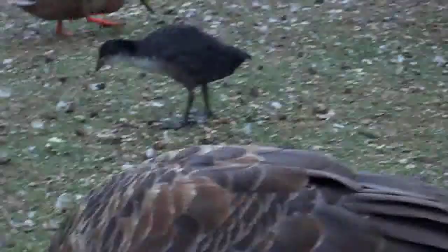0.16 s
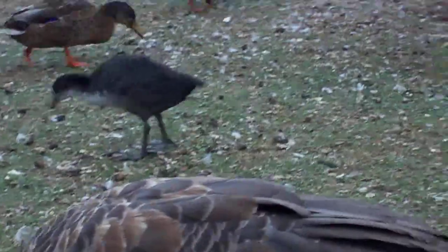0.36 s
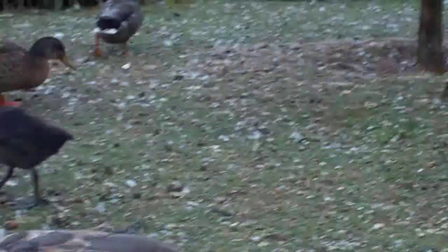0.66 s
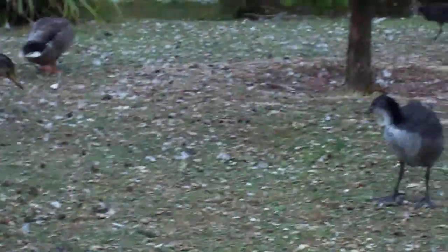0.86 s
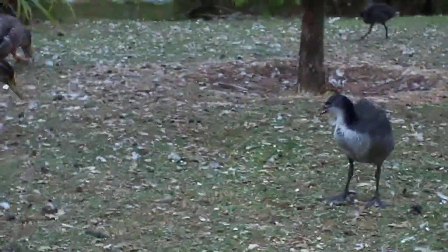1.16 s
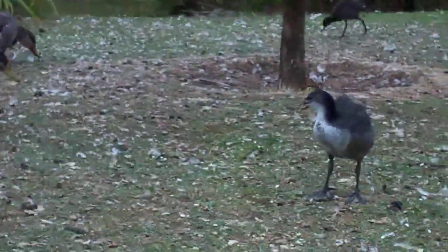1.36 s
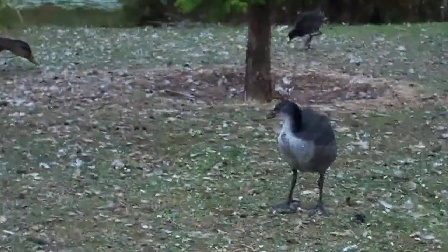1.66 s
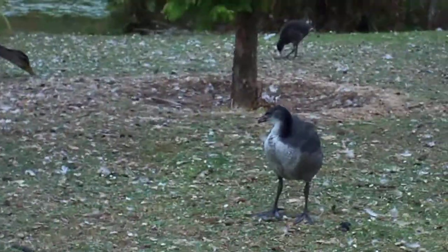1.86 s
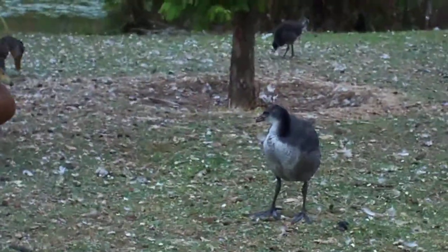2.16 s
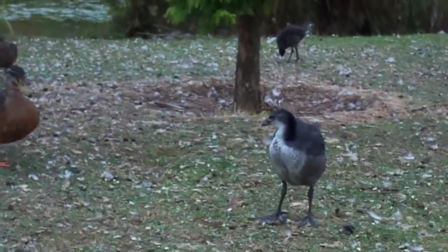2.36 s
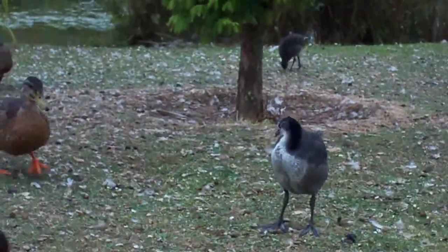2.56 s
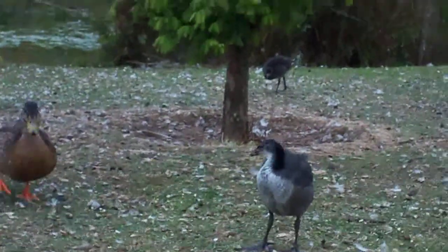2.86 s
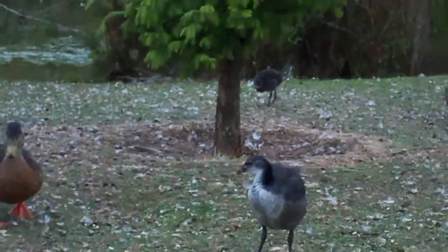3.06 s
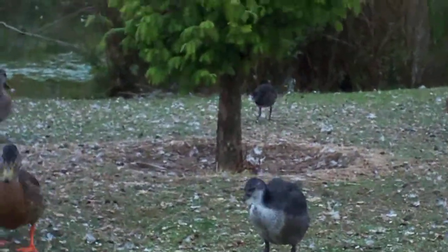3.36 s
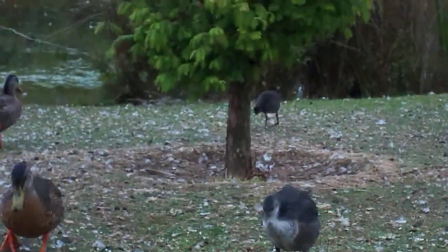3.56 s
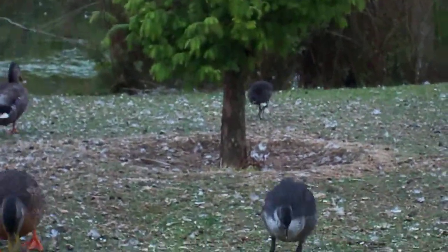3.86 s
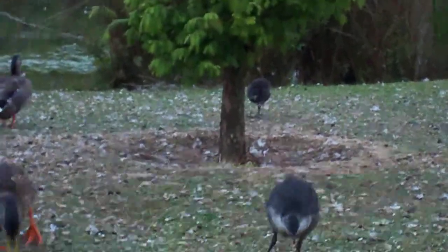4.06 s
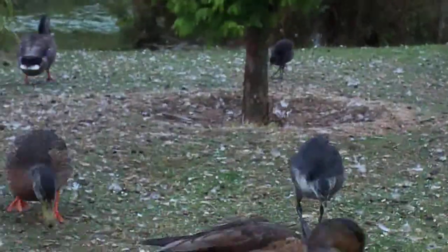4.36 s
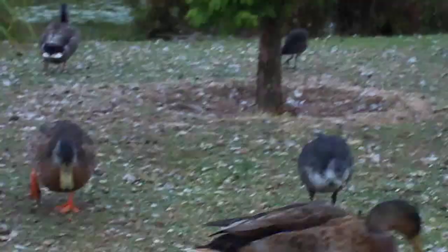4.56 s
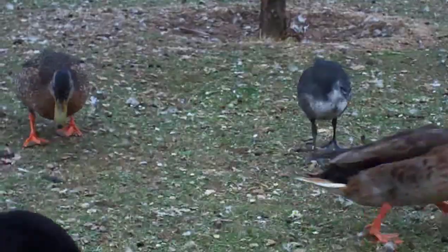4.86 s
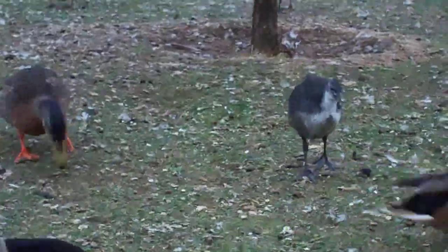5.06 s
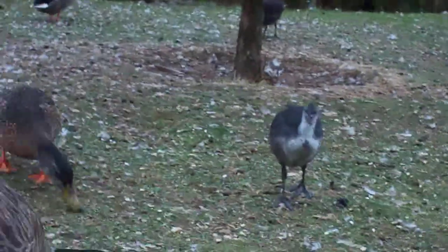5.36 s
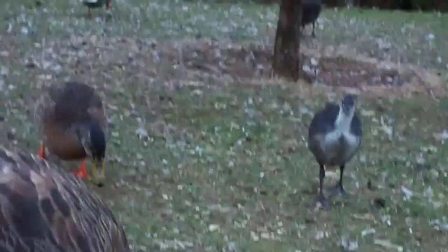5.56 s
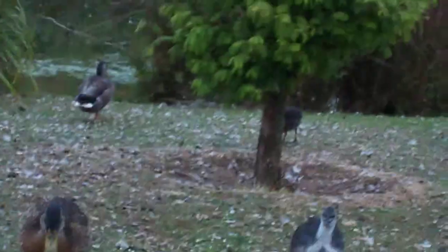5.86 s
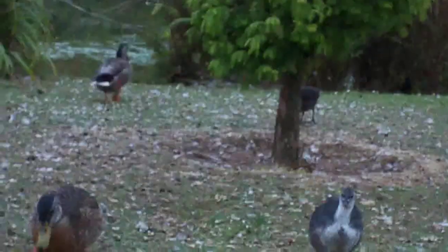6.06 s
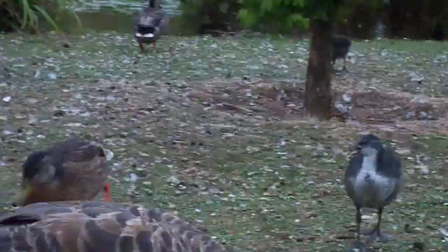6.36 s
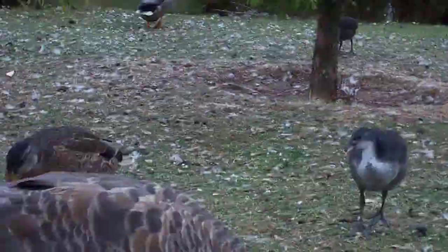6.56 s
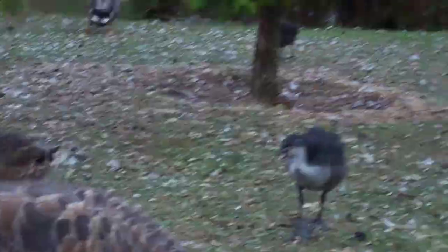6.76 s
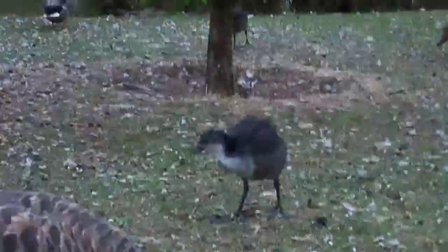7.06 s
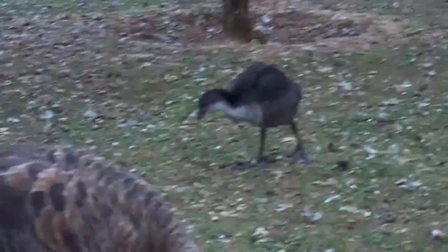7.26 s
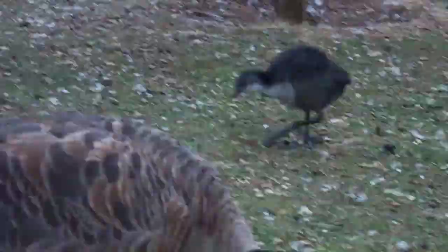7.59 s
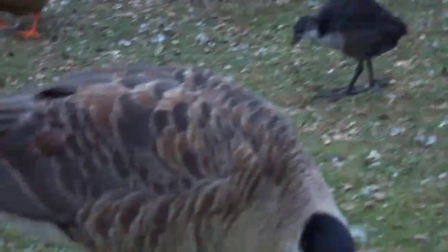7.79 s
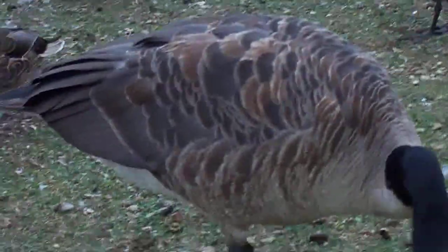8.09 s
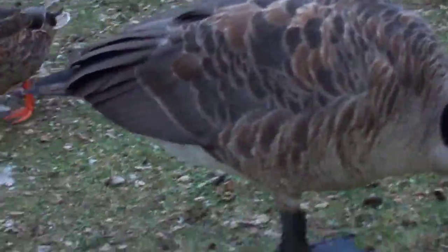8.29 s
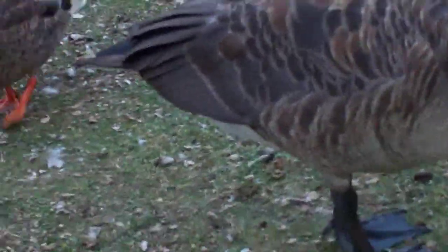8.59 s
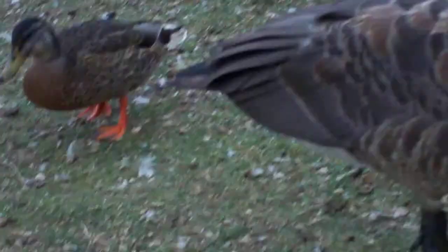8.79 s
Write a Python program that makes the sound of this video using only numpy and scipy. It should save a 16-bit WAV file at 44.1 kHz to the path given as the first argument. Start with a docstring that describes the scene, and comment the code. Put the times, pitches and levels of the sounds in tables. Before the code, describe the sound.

Young waterbirds beg with rasping, whistly calls while ducks cluck between them on a lakeside lawn; later a paper bag rustles close by.

```python
"""A lakeside lawn in open air: low far rumble and faint hiss (coloured noise), and a far motor's hum (a sine).
Young coots beg from the first half second: gliding whistles that break into chaos and split as they drop.
Ducks cluck between them (half-rate pulses through throat and chest); thin gliding notes (near chick, far birds),
a little duck chatter (slow pulses) and dry ticks follow. From about 6.2 s a feed bag rustles close by, random
grains with snapping creases; a soft bump reaches the small mono microphone, and the bag ends with two low thumps."""
import sys
import numpy as np
from scipy import signal
from scipy.fft import rfft, irfft, next_fast_len
from scipy.io import wavfile
from scipy.ndimage import map_coordinates

SR = 44100
rng = np.random.default_rng(int(sys.argv[2]) if len(sys.argv) > 2 else 0)


def unload_wav(signal):
    """Save mono or channel-first audio to the path in sys.argv[1] as 16-bit WAV at rate SR, clipped to [-1, 1]."""
    wavfile.write(
        sys.argv[1],
        SR,
        np.round(np.clip(np.atleast_2d(signal).T, -1, 1) * 32767).astype(np.int16),
    )


N = 393792
T = np.arange(N) / SR  # time of every sample [s]

# how the bag's paper colours its rustle and its snaps: (frequency [Hz], gain [dB])
PAPER_SPECTRUM = [(120, -30), (200, -8), (279, -0.5), (647, -8), (946, -1), (1320, 0.5), (1760, -1.5),
                  (2920, 0), (7200, -3.5), (7670, -5), (8850, -13), (11500, -48.5), (19500, -120)]


def undb(db):
    """Decibels to gain."""
    return 10 ** (np.asarray(db) / 20)


def unit(x):
    """Scale by the standard deviation, to rms 1 for a signal centred on zero."""
    return x / (np.std(x) + 1e-12)


def curves(rows, t):
    """Every column of a table after its times, joined by straight lines."""
    s, *columns = np.transpose(rows)
    return [np.interp(t, s, c) for c in columns]


def add(out, s, x):
    """Mix x in from time s."""
    i = max(int(s * SR), 0)
    out[i:i + len(x)] += x[:max(N - i, 0)]


def colour(x, points):
    """Filter by a spectrum of (frequency [Hz], gain [dB]) points, joined along log frequency."""
    hz, db = np.transpose(points)
    size = next_fast_len(len(x))
    f = np.maximum(np.fft.rfftfreq(size, 1 / SR), 1)
    gain = undb(np.interp(np.log(f), np.log(hz), db))
    return irfft(rfft(x, size) * gain, size)[:len(x)]


def ring(x, hz, width_hz):
    """One resonance, gain 1 at its centre."""
    return signal.lfilter(*signal.iirpeak(hz, hz / width_hz, fs=SR), x)


def wander(t, rate_hz):
    """Smooth curve through random steps of spread 1, rate_hz steps a second."""
    steps = rng.standard_normal(1 << 13)
    return map_coordinates(steps, [(t - t[0]) * rate_hz], order=3, mode="wrap")


def span(start, end):
    """Sample times of one call, and a gate that opens and shuts it softly."""
    t = np.arange(start, end, 1 / SR)
    return t, np.clip(np.minimum(t - t[0], t[-1] - t) / .004, 0, 1)


def turn(hz):
    """Phase of an oscillator: its frequency summed over time."""
    return 2 * np.pi * np.cumsum(hz) / SR


def ramp(t, length_s):
    """Goes from 0 to 1 in length_s, centred on t = 0."""
    return np.clip(t / length_s + .5, 0, 1)


def traffic():
    """Far traffic: noise of low frequencies whose level drifts and sways."""
    # shape of the rumble: (frequency [Hz], relative density [dB per Hz])
    rumble_spectrum = [(12, 2), (22, -1.5), (45, -4.5), (66, -2.5), (85, -11.5), (130, -17.5), (200, -31),
                       (400, -59)]
    # rumble before its sway: (time [s], level [dB])
    rumble_levels = [(0, -36.5), (.25, -35), (1.1, -36.5), (1.29, -43), (1.52, -36), (2.1, -39.5),
                     (5.3, -38.5), (6.1, -40), (8.93, -39)]
    sway_db, sway_hz = 1.35, 6
    rumble = unit(colour(rng.standard_normal(N), rumble_spectrum))
    return rumble * undb(curves(rumble_levels, T)[0] + sway_db * wander(T, sway_hz))


def park_air(air_db=-51):
    """Faint hiss of the park: coloured noise that sways slowly."""
    # shape of the hiss: (frequency [Hz], relative density [dB per Hz])
    air_spectrum = [(40, -19), (130, 2.5), (200, -1), (280, -3.5), (370, -14.5), (460, -9), (570, -16),
                    (900, -14), (1500, -22), (3000, -26.5), (7300, -26), (8500, -31.5)]
    air = unit(colour(rng.standard_normal(N), air_spectrum))
    return air * undb(air_db + 1.3 * wander(T, 2.444))


def motor(motor_hz=110.5, trim_db=-0.5):
    """A distant motor heard as one sine line whose pitch drifts slightly."""
    # hum before trim_db: (time [s], level [dB])
    motor_levels = [(0.0, -50), (2.21, -46), (2.34, -60), (2.54, -50), (4.2, -41), (4.35, -48.5),
                    (4.87, -38.5), (6.02, -59), (6.21, -44.5), (6.64, -59), (7.44, -41), (7.61, -51),
                    (8.58, -45), (8.93, -62)]
    hum = unit(np.sin(turn(motor_hz * (1 + 0.004 * wander(T, 2.36)))))
    return hum * undb(curves(motor_levels, T)[0] + trim_db)


def trees(x, echo_db=-27, t60_s=0.19):
    """Faint scatter from the trees along the shore: a decaying noise tail after a 10 ms gap."""
    t = np.arange(SR // 2) / SR
    tail = rng.standard_normal(len(t)) * np.exp(-np.log(1000) * t / t60_s) * (t > .01)
    return x + undb(echo_db) * signal.fftconvolve(x, tail / np.linalg.norm(tail))[:N]


def thin_note(start, length_s, start_hz, end_hz, db):
    """A thin gliding note, slightly wavering, with two weak overtones."""
    t, gate = span(start, start + length_s)
    left = np.linspace(1, 0, len(t))
    hz = end_hz + (start_hz - end_hz) * left ** 1.5  # glides fast at first, then levels off
    phase = turn(hz * (1 + 0.0031 * wander(t, 80)))
    swell = 2 * np.sqrt(left * (1 - left))
    tone = np.sin(phase) + undb(-10.5) * np.sin(2 * phase) + undb(-12) * np.sin(3 * phase)
    return gate * swell * undb(db) * unit(tone)


def chatter(t, length_s, pulse_hz=82):
    """Slow pulses of a duck's voice ring two throat resonances."""
    cycles = turn(pulse_hz * (1 + 0.094 * wander(t, 60))) / (2 * np.pi)
    pulses = np.diff(np.floor(cycles), prepend=0)
    lower = ring(ring(pulses, 1570, 400), 1600, 400)
    upper = ring(ring(pulses, 2830, 550), 2800, 550)
    return unit(lower + upper) * np.exp(-(t / length_s) ** 2)


def cluck(t, low_hz, burst_db, squeak_db, throat_hz, chest_db, burst_s=0.013):
    """A squeak dips and climbs out louder; around the bottom a burst of half-rate pulses breaks in."""
    dip = np.exp(-(t / .025) ** 2)
    burst = np.exp(-((t - .006) / burst_s) ** 2)  # just past the bottom
    top_hz = 1520 + 130 * np.tanh(t / .02)  # higher on the way out
    phase = turn((top_hz + (low_hz - top_hz) * dip) * (1 + .045 * dip * wander(t, 500)))
    pulses = sum(np.cos(k * phase / 2) for k in range(1, 15)) * undb(2 * wander(t, 400))
    throat = ring(ring(pulses, throat_hz, 880), throat_hz, 880)
    chest = ring(ring(pulses, 390, 480), 390, 480)
    voiced = (throat + undb(chest_db) * chest) * burst
    voiced = voiced / np.sqrt(np.average(voiced ** 2, weights=burst))
    squeak = np.sin(phase) + .4 * dip * np.sin(2 * phase)
    squeak = squeak * (dip + .4 * np.exp(-(t / .05) ** 4))
    climb = undb(3 * np.tanh(t / .015))  # the way up is louder than the way down
    return undb(burst_db) * voiced + undb(squeak_db) * squeak * climb


def ticks_and_thumps():
    """Dry ticks, and at the end two low dull thumps of the feed bag: short pushes on damped rings."""
    # the last two rows are the thumps: (time [s], peak level [dB], ring frequency [Hz], ring width [Hz])
    knocks = [(2.276, -35, 700, 1500), (3.7615, -34, 1800, 4000), (4.033, -35, 600, 1500),
              (4.2219, -19, 1500, 4000), (4.2236, -6, 3440, 1280), (5.29, -32, 1700, 2500),
              (8.607, -20.5, 450, 400), (8.628, -20.5, 480, 400)]
    out = np.zeros(N)
    push = np.pad(signal.windows.hann(12), (0, 500))
    for s, db, hz, width_hz in knocks:
        knock = ring(push, hz, width_hz)
        add(out, s, undb(db) * knock / np.abs(knock).max())
    return out


def bump():
    """A soft bump on the microphone: a dull low sine that swells and dies within a few cycles."""
    # (time of its middle [s], length [s], pitch [Hz], level [dB])
    thud = (7.405, .025, 74, -32)
    s, length_s, hz, db = thud
    swell = np.exp(-((T - s) / length_s) ** 2)
    return undb(db) * np.sqrt(2) * swell * np.sin(2 * np.pi * hz * (T - s))


def crackle(grain_rate, spread_db, bunch_db):
    """Tiny creases of uneven size, grain_rate a second on average, that come in bunches."""
    sizes = undb(spread_db * np.minimum(rng.exponential(size=N), 5)) * rng.standard_normal(N)
    return sizes * (rng.random(N) < grain_rate / SR) * undb(bunch_db * wander(T, 130))


def handling():
    """Strength of the rustle: fumbling with brief squeezes on top, added as power."""
    # fumbling with the bag, silent before the first row: (time [s], relative level [dB])
    fumbling = [(6.22, -70), (6.3, -50), (6.46, -56), (6.7, -38.5), (7.04, -44.5), (7.3, -40),
                (7.62, -41.5), (8.2, -43.5), (8.45, -51.5), (8.72, -43.5), (8.9, -63.5)]
    # squeezes of the bag: (time of the middle [s], length [s], relative level [dB])
    squeeze_rows = [(6.268, 0.019, -42.5), (6.784, 0.061, -34.5), (7.008, 0.0069, -37), (7.556, 0.021, -36),
                    (7.955, 0.045, -34), (8.607, 0.0085, -27.5), (8.632, 0.0068, -29.5)]
    squeezes = sum((undb(db) * np.exp(-((T - s) / length_s) ** 2)) ** 2
                   for s, length_s, db in squeeze_rows)
    steady = undb(curves(fumbling, T)[0]) ** 2 * (T > fumbling[0][0])
    return np.sqrt(steady + squeezes)


def rustle(crisp_db=-5.0, crisp_hz=6400, flutter_db=1.85):
    """Dense tiny creases of the bag crackle, and sparser crisp ones ride on top."""
    dense = crackle(grain_rate=4000, spread_db=1.75, bunch_db=2.5)
    sparse = crackle(grain_rate=1200, spread_db=3.5, bunch_db=5)
    body = unit(colour(dense, PAPER_SPECTRUM))
    crisp = unit(ring(colour(sparse, PAPER_SPECTRUM), crisp_hz, 3000))
    flutter = undb(flutter_db * wander(T, 45) - 1.5)
    return (body + undb(crisp_db) * crisp) * handling() * flutter


def snaps(snap_db=-1.5, crease_s=0.0015):
    """A few large creases snap: fast-dying noise through the paper and a broad resonance."""
    # (time [s], peak level before snap_db [dB], centre frequency [Hz])
    creases = [(6.2532, -27.5, 3760), (6.2797, -22, 3710), (6.6514, -21, 3660), (6.7244, -21, 3610),
               (6.7824, -18, 2790), (6.8277, -22, 2330), (6.8982, -25, 7120), (6.9194, -22.5, 7190),
               (6.972, -25, 2170), (6.9983, -21, 7250), (7.0087, -20.5, 7030), (7.0625, -19, 2070),
               (7.1112, -25, 3010), (7.1367, -20, 5940), (7.1462, -19.5, 3680), (7.215, -26, 6100),
               (7.267, -20, 3500), (7.3378, -20, 3750), (7.3914, -20.5, 5070), (7.4091, -22.5, 6480),
               (7.4757, -30, 3400), (7.5624, -27, 1560), (7.6244, -26, 4650), (7.6375, -20.5, 2930),
               (7.6674, -25, 5310), (7.701, -21.5, 5220), (7.8022, -14.5, 6990), (7.8344, -25, 4800),
               (7.8805, -23, 5600), (7.9474, -19.5, 2650), (8.0975, -24, 2570), (8.5946, -19, 1930),
               (8.6303, -16, 5110)]
    out = np.zeros(N)
    t = np.arange(SR // 50) / SR
    for s, db, hz in creases:
        snap = rng.standard_normal(len(t)) * np.exp(-t / crease_s)
        snap = ring(colour(snap, PAPER_SPECTRUM), hz, 8400)
        add(out, s, undb(db + snap_db) * snap / np.abs(snap).max())
    return out


def beg_pitch(t, clear, fall_s, rise_s, start_hz, held_hz, late_hz, step_hz, end_hz):
    """The pitch scoops to a held note and drifts, steps down as the rasp clears, then falls ever faster."""
    held = np.interp(t, [t[0], fall_s], [held_hz, late_hz])
    scoop = (start_hz - held_hz) * np.exp(-(t - t[0]) / rise_s)
    fall = np.clip((t - fall_s) / (t[-1] - fall_s), 0, 1) ** 1.95  # gathers speed
    return held + scoop - step_hz * clear - (late_hz - step_hz - end_hz) * fall


def beg_level(t, start_db, peak_db):
    """The chick pushes steadily harder and lets go at the very end; in dB."""
    onset_s, release_s, fade_db = 0.0073, 0.031, -25  # the fade in spans half of fade_db
    times = [t[0], t[0] + onset_s, t[-1] - release_s, t[-1]]
    return np.interp(t, times, [start_db + fade_db / 2, start_db, peak_db, peak_db + fade_db])


def membrane(t, hz, tone_db, over_db, half_db, rasp_db, rasp_hz, third_db=-3,
             chaos_swing=0.11, chaos_hz=900, chaos_db=-2, hiss_db=-4.5, smear=0.073):
    """A chick's membrane whistles, doubles its period, or tumbles into chaos when pushed hard."""
    # rasp noise as it leaves the beak: (frequency [Hz], gain [dB])
    beak_spectrum = [(900, -49.5), (1350, -15), (1650, -9), (2000, -5.5), (2500, -3.5), (2900, -14.5),
                     (3600, -0.5), (4400, -7), (5200, -10), (6900, -8), (7900, -12), (9000, -21)]
    growl_rise = 550  # Hz per s: the low growl climbs as the chick pushes harder
    hiss_growth = 0.094  # dB of extra breathy hiss per dB of rasp
    tone, over, half, rasp = undb([tone_db, over_db, half_db, rasp_db])
    rough = rasp / (rasp + tone)

    # the whistle grows less steady as the rasp takes over, and brighter as it gets louder
    phase = turn(hz * (1 + .003 * wander(t, 60.8) + 0.043 * rough ** 2 * wander(t, 700)))
    third = undb(third_db + 0.28 * (over_db + 32.0))
    overtones = np.sin(2 * phase) + third * np.sin(3 * phase)

    # every second cycle differs: lines between the harmonics, which smear in a rough voice
    split = phase / 2 + turn(hz * smear * rough * wander(t, 900))
    between = np.sin(phase + split)
    between = between + undb(-14.5) * np.sin(2 * phase + split) + undb(-13.5) * np.sin(3 * phase + split)
    # on high notes lines at the half pitch and just below the whistle take over
    high = np.clip((hz - 2750) / 200, 0, 1)
    below = np.sin(split) + np.sin(split * 3 / 2)
    between = (1 - 0.66 * high) * between + 0.97 * high * below
    whistle = tone * np.sqrt(2) * np.sin(phase) + over * unit(overtones) + half * unit(between)
    whistle = whistle * undb(.8 * wander(t, 120))

    # in chaos the pitch jumps from one millisecond to the next, and a low rasp growls near half of it
    tumble = turn(rasp_hz * (1 + chaos_swing * wander(t, chaos_hz)))
    growl_hz = rasp_hz * .55 + growl_rise * (t - t.mean())
    growl = np.sin(turn(growl_hz * (1 + .04 * wander(t, 600))))
    growl = undb(-12) * np.clip((3500 - rasp_hz) / 600, 0, 1) * growl  # fades out in high rasps
    chaos = (np.sin(tumble) + undb(-15) * np.sin(2 * tumble) + growl) * undb(1.2 * wander(t, 400))

    hiss = unit(colour(rng.standard_normal(len(t)), beak_spectrum)) * undb(0.93 * wander(t, 320))
    hiss_gain = undb(hiss_db + hiss_growth * (rasp_db + 37))
    return whistle + rasp * (undb(chaos_db) * unit(chaos) + hiss_gain * hiss)


def beg(start, fall_s, end, rise_s, start_hz, held_hz, late_hz, step_hz, end_hz,
        start_db, peak_db, bright_db, rasp_on, rasp_off, rasp_db, duck_db, rasp_start_hz, rasp_end_hz,
        split_s):
    """One call swells from a whistle into a rasp, clears on a lower note, and splits as it drops."""
    break_in_s, break_out_s = 0.077, 0.013  # time to tip into the rasp and out of it
    waver, waver_hz = .009, 21.95  # share by which the note wavers until it clears, and how often
    duck_early, duck_late = .45, 1.22  # share of duck_db as the rasp starts and ends: chaos gains
    brighten = 0.48  # dB of overtones gained per dB of loudness
    # half-pitch lines against the whistle: at the closing split, before it, and during the rasp
    split_db, unsplit_db, hoarse_split_db = -2.5, -22, -5.5
    high_voice_hz = 3000  # the rasp brings those lines up only in voices held below this
    clear_rasp_db, split_rasp_db = -13, -7  # rasp in the clear parts, and as the voice splits

    t, gate = span(start, end)
    clear = ramp(t - rasp_off, break_out_s)
    hoarse = ramp(t - rasp_on, break_in_s) * (1 - clear)
    split = ramp(t - (end - split_s), .012)
    hz = beg_pitch(t, clear, fall_s, rise_s, start_hz, held_hz, late_hz, step_hz, end_hz)
    hz = hz * (1 + waver * (1 - clear) * wander(t, waver_hz))

    db = beg_level(t, start_db, peak_db)
    duck_share = np.interp(t, [rasp_on, rasp_off], [duck_early, duck_late])
    tone_db = db + duck_db * hoarse * duck_share
    over_db = tone_db + bright_db + brighten * (db + 33.5)
    split_rise = (split_db - unsplit_db) * split
    hoarse_rise = (hoarse_split_db - unsplit_db) * hoarse * (held_hz < high_voice_hz)
    half_db = tone_db + unsplit_db + np.maximum(split_rise, hoarse_rise)
    rasp_rise = np.maximum((rasp_db - clear_rasp_db) * hoarse, (split_rasp_db - clear_rasp_db) * split)
    hoarse_db = db + clear_rasp_db + rasp_rise
    rasp_hz = np.interp(t, [rasp_on, rasp_off], [rasp_start_hz, rasp_end_hz])
    return gate * membrane(t, hz, tone_db, over_db, half_db, hoarse_db, rasp_hz)


def birds():
    """All the voices on the lawn and beyond it, each placed at its time."""
    # thin gliding notes: a near chick's opening scoop at 0.968 s, the rest from birds further off:
    # (start [s], length [s], start pitch [Hz], end pitch [Hz], level [dB])
    thin_notes = [(0.968, 0.086, 1850, 2880, -51), (1.715, 0.047, 1120, 920, -55),
                  (1.951, 0.042, 780, 850, -50), (2.31, 0.26, 2280, 2440, -65),
                  (2.7, .035, 3500, 4400, -54.5), (3.621, 0.19, 2380, 2430, -58),
                  (5.076, .19, 2290, 2750, -66)]
    # soft duck chatter: (time of its middle [s], length [s], level [dB])
    chatter_rows = [(2.669, 0.024, -51), (3.311, 0.019, -54.5)]
    # duck clucks: (time of the dip [s], lowest pitch [Hz], burst level [dB], squeak level [dB],
    #  throat resonance [Hz], chest against throat [dB])
    clucks = [(0.549, 752, -53.5, -50.5, 1090, 6), (0.879, 794, -38.5, -45, 950, 0),
              (2.338, 637, -49.5, -50, 1200, -10), (2.782, 777, -46, -59, 860, 9),
              (3.099, 627, -38.5, -55, 960, 11), (3.819, 746, -51, -46, 1550, -11),
              (4.103, 687, -42, -46, 1080, 1), (5.448, 647, -35, -48.5, 1600, -10),
              (5.736, 596, -24.5, -50, 1830, -13), (6.331, 706, -38.5, -51.5, 1870, -11),
              (8.315, 674, -40, -64, 1120, 9)]
    # begging calls of the young coots: (start [s], fall from [s], end [s], rise time [s],
    #  start pitch [Hz], held pitch [Hz], late pitch [Hz], step down [Hz], end pitch [Hz],
    #  start level [dB], peak level [dB], overtones before brightening [dB], rasp on [s], rasp off [s],
    #  rasp against the call [dB], whistle's loss under the rasp before its share [dB],
    #  rasp start pitch [Hz], rasp end pitch [Hz], split length [s])
    begs = [ (0.342, 0.718, .808, .026, 1460, 2760, 2750, 450, 1750, -49.5, -38, -5.5, 0.47, 0.75, 1, -12, 2900, 3280, 0.029),
            (0.969, 1.539, 1.635, .075, 2347, 3750, 3120, 60, 1530, -56.5, -49, -1.5, 1.24, 1.54, -5, -1.5, 3570, 3050, 0.28),
            (1.07, 1.35, 1.47, .07, 2530, 2300, 2785, 100, 1600, -42, -39, -4, 1.1, 1.395, -1, -0.5, 3410, 3670, 0.053),
            (2.75, 3.181, 3.272, .05, 1410, 2640, 2804, 480, 1846, -49, -30.5, -0.5, 2.875, 3.15, 2.5, -12, 2800, 3097, 0.033),
            (4.12, 4.5, 4.638, .034, 1900, 3480, 3130, 520, 1700, -46.5, -40.5, -3.5, 4.265, 4.524, 1.5, 0, 3500, 2950, .075),
            (4.6, 4.95, 5.08, .018, 1850, 2360, 2650, 220, 1600, -47, -36.5, -2, 4.68, 4.925, 2, -3, 3660, 3470, .155),
            (5.313, 5.719, 5.822, .017, 1766, 2480, 2680, 251, 1903, -46, -30.5, -3, 5.41, 5.7, 0.5, -14.5, 2668, 2960, 0.032),
            (6.292, 6.749, 6.87, .04, 2080, 3295, 3725, 750, 1640, -50.5, -37.5, -21, 6.35, 6.787, 0, 0.5, 3406, 3444, 0.03),
            (7.991, 8.439, 8.508, .04, 1953, 2677, 2764, 246, 1810, -46, -28.5, 1, 8.13, 8.4, 2.5, -9.5, 2796, 3060, 0.033),
            (8.46, 8.68, 8.77, .02, 3560, 3600, 3430, 100, 1660, -47.5, -44, -10, 8.54, 8.72, -1.5, -1.5, 3400, 3110, .02),
            (8.519, 8.789, 8.866, .03, 2400, 2800, 2596, 201, 1590, -55, -44.5, -8, 8.6, 8.78, 0, -3.5, 2860, 2610, 0.043)]
    out = np.zeros(N)
    for note in thin_notes:
        add(out, note[0], thin_note(*note))
    t = np.arange(-SR // 10, SR // 10) / SR  # 0 at the middle of a duck's sound
    for s, length_s, db in chatter_rows:
        add(out, s + t[0], undb(db) * chatter(t, length_s))
    for s, *voice in clucks:
        add(out, s + t[0], cluck(t, *voice))
    for call in begs:
        add(out, call[0], beg(*call))
    return out


def scene():
    """Everything reaches one microphone, so both channels are alike; only the birds get the trees' scatter."""
    background = traffic() + park_air() + motor()
    close_by = ticks_and_thumps() + bump() + rustle() + snaps()
    mono = background + close_by + trees(birds())
    return np.array([mono, mono])


def record(dry):
    """The recorder droops above 7.5 kHz and then cuts the top steeply at 8.8 kHz."""
    droop = [(7500, 0.5), (8300, -5.5), (9000, -17.0)]  # (frequency [Hz], gain [dB])
    soft = np.array([colour(x, droop) for x in dry])
    return signal.sosfilt(signal.ellip(10, .2, 80, 8800, fs=SR, output="sos"), soft)


dry = scene()
out = record(dry)
unload_wav(out)
```